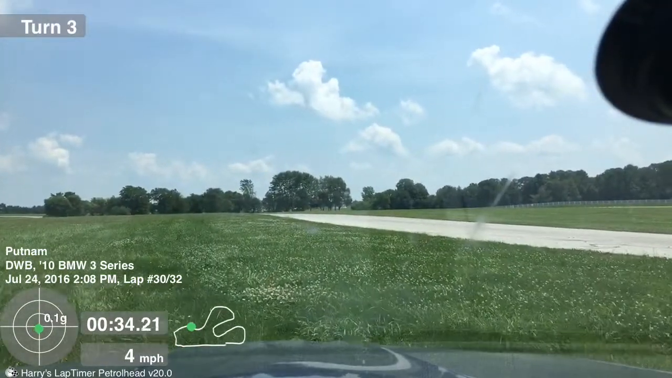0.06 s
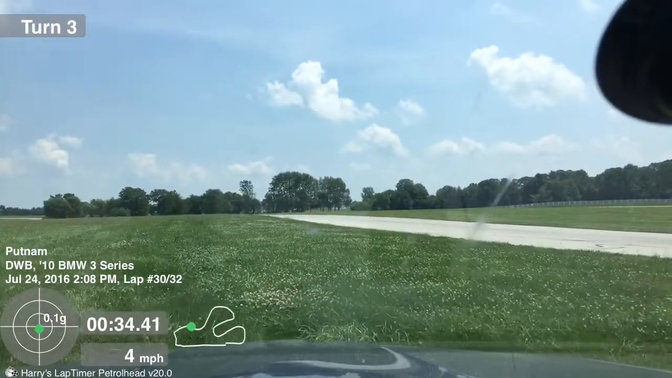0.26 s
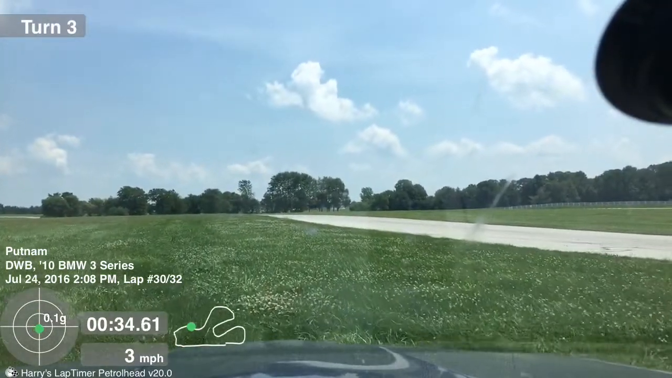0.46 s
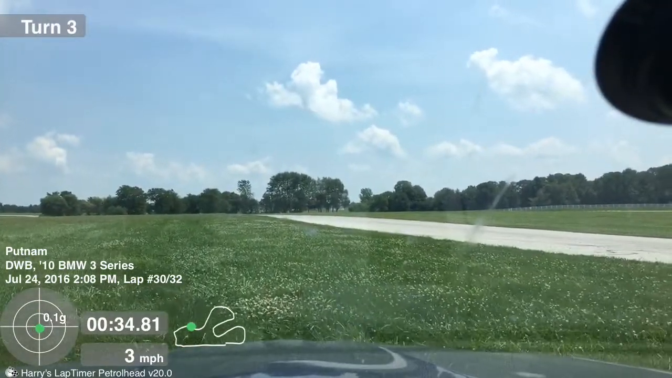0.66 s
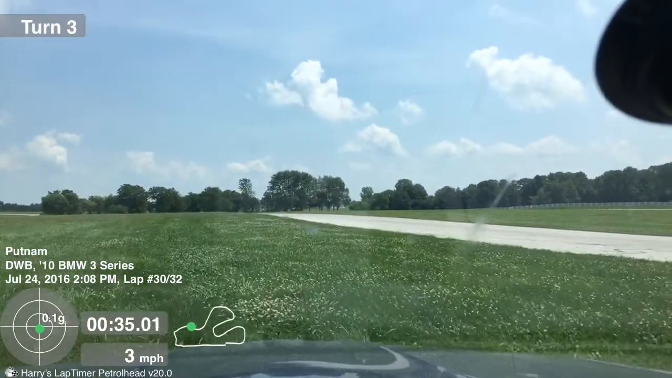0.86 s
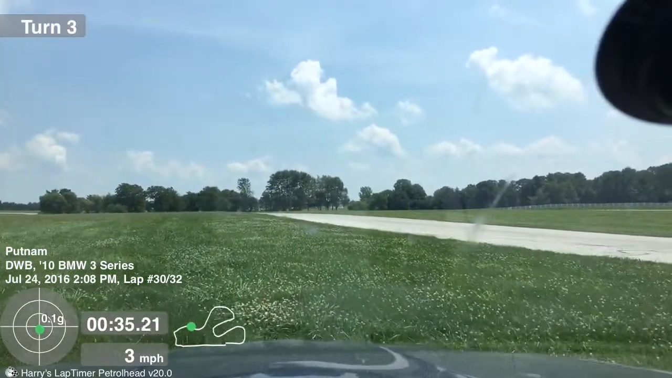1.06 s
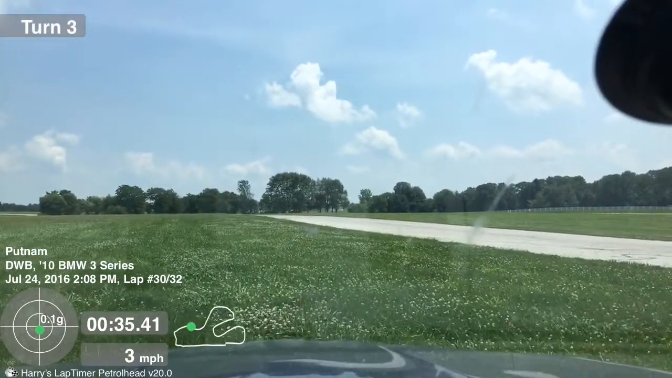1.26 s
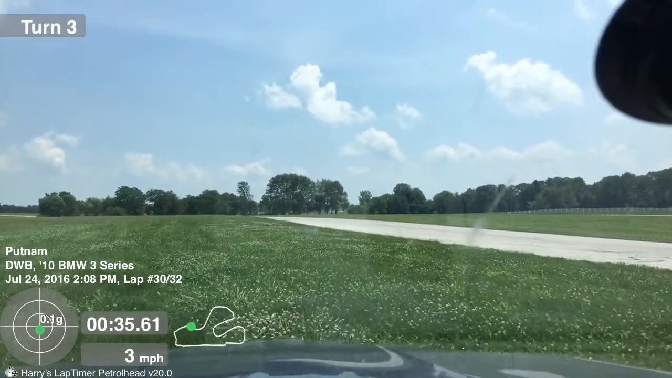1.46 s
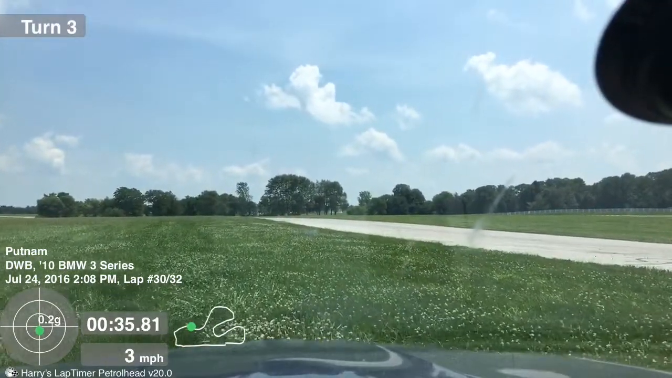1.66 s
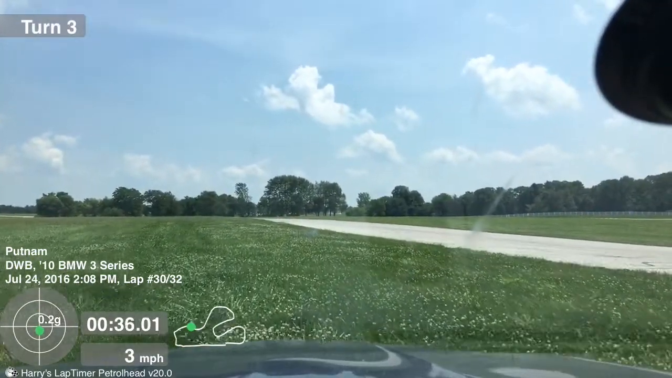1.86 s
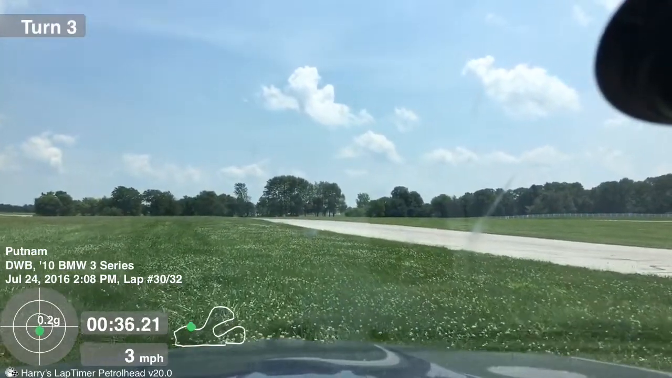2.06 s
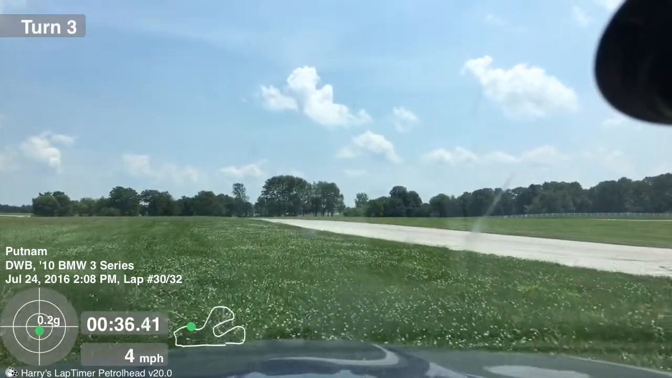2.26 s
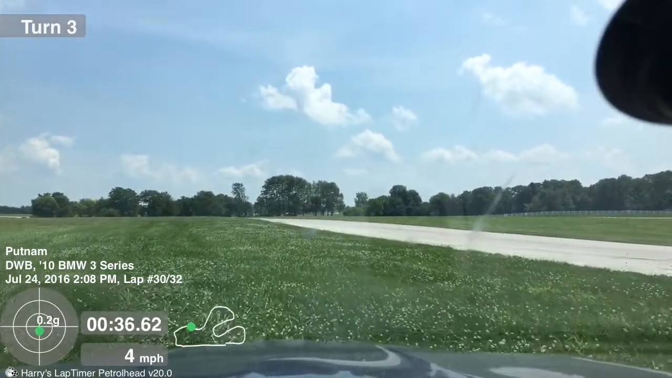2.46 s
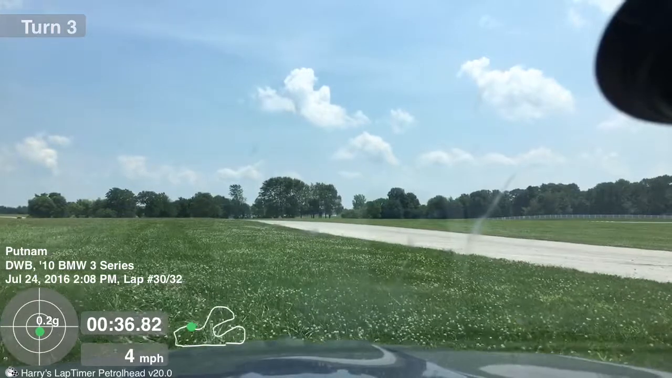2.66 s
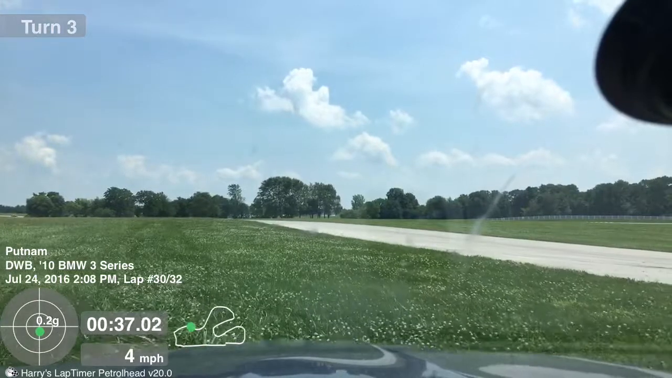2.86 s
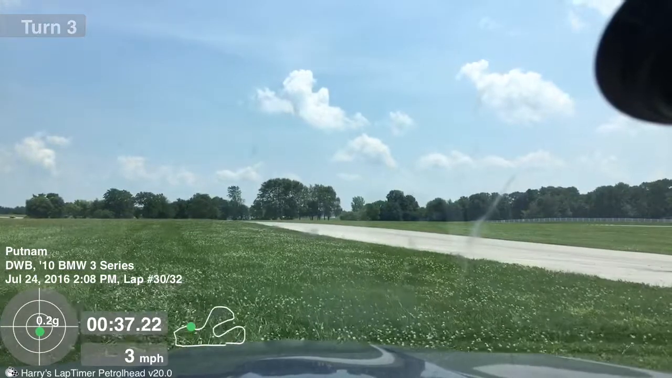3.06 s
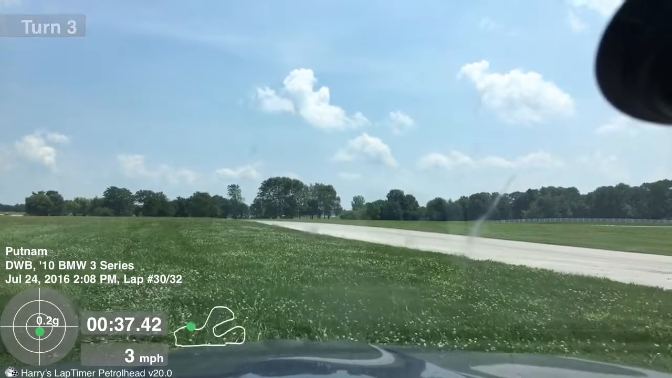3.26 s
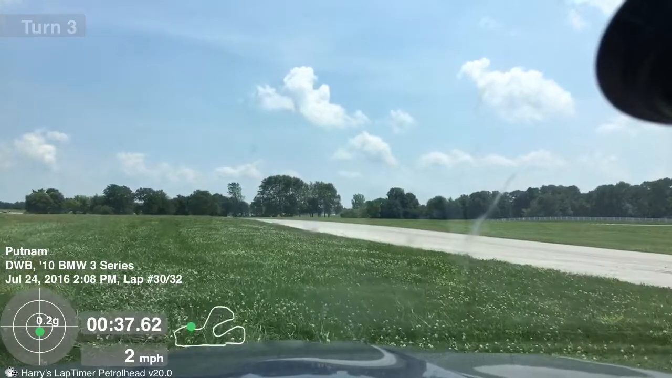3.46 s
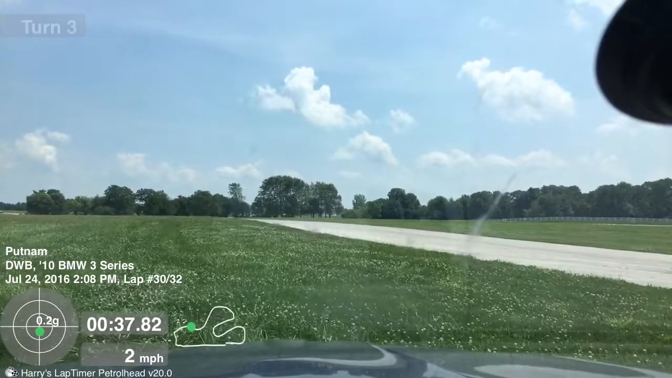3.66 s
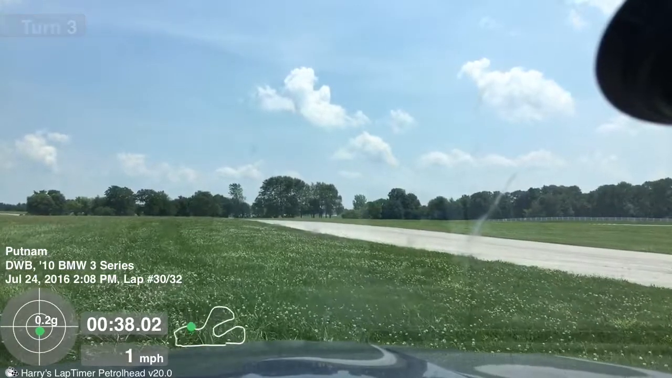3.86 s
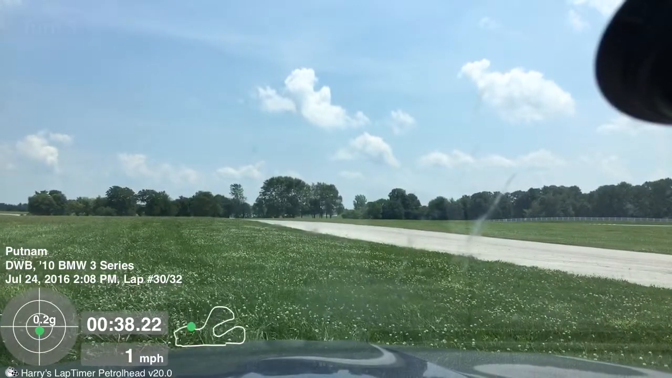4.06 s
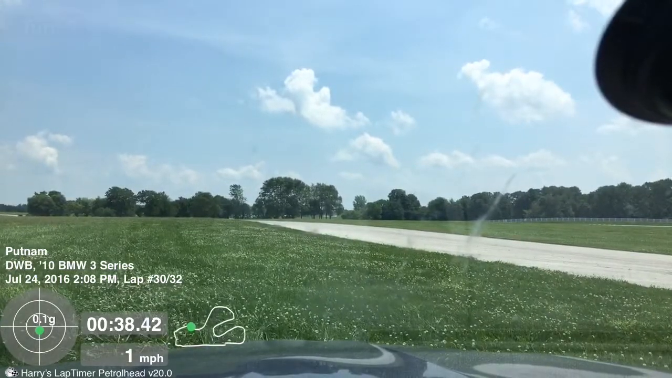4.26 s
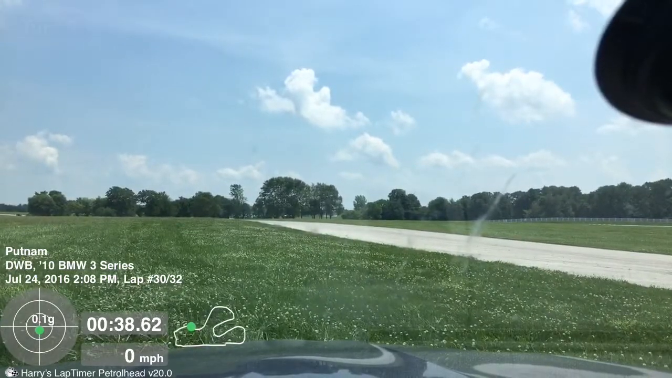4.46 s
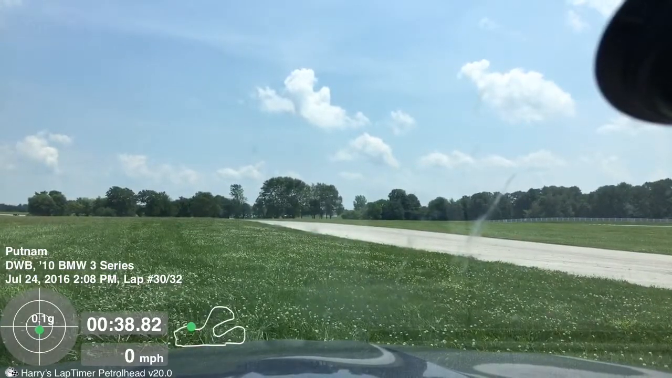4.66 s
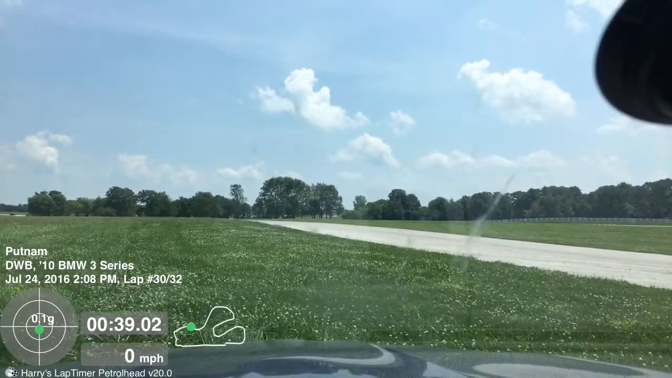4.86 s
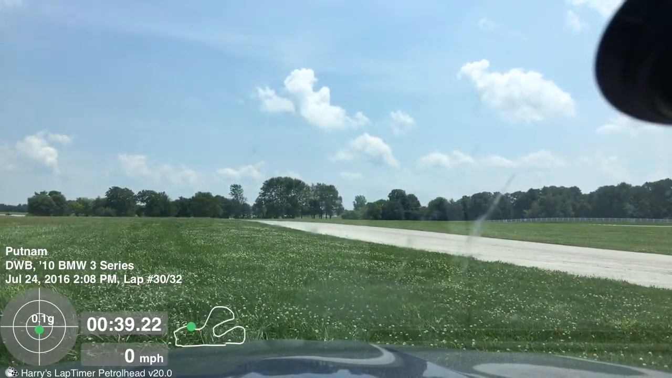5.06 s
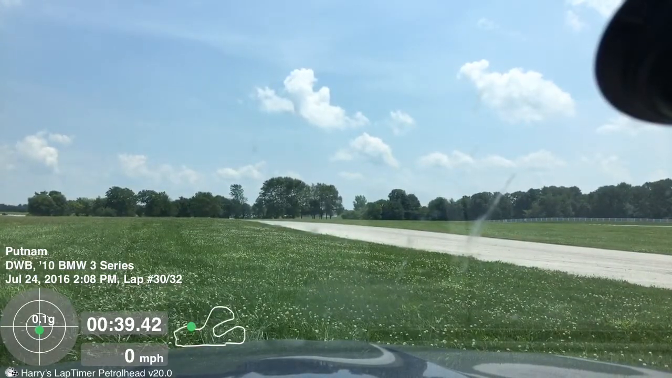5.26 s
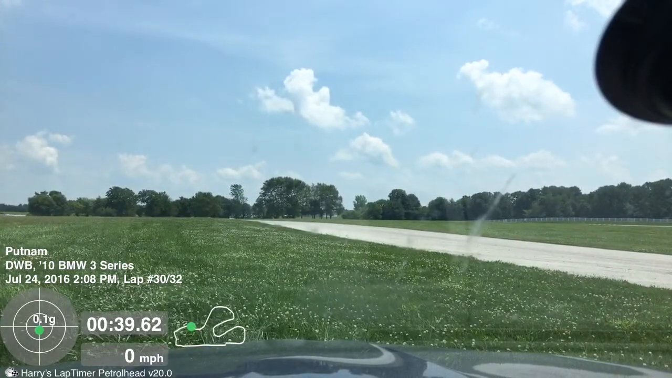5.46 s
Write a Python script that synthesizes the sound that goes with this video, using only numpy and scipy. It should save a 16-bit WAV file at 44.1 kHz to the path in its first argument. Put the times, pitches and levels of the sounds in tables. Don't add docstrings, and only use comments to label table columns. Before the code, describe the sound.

Close car-cabin sound: deep engine drone, muffled bumps and crackly rustling, a hollow gear lever knock midway, then steady idle with airy fan hiss.

```python
import sys
import numpy as np
from scipy import signal
from scipy.fft import rfft, irfft
from scipy.io import wavfile
from scipy.ndimage import uniform_filter1d

SR = 44100
rng = np.random.default_rng(int(sys.argv[2]) if len(sys.argv) > 2 else 0)


def persist_wave(psi):
    counts = np.round(np.clip(psi, -1, 1) * 32767).astype(np.int16)
    wavfile.write(sys.argv[1], SR, np.atleast_2d(counts).T)


def makeup_ratio(level_db):
    decades = np.asarray(level_db, float) / 20
    return 10 ** decades


N = 242991
T = np.arange(N) / SR

# time in seconds, firing rate in Hz, load in dB.
ENGINE_RUN = [(0, 39.77, -6), (.34, 39.17, -16), (.72, 49.14, 0.5), (.92, 54.24, -3.5), (1.12, 65.74, -1.5),
              (1.28, 65.97, 1), (1.49, 54.5, 0.5), (1.7, 51.35, 0.5), (2.09, 50.35, 1.5), (2.36, 54.12, 2),
              (2.49, 53.98, -2), (2.7, 49.45, 0.5), (2.9, 49.16, -1), (3.06, 50.15, 3), (3.19, 49.3, -15),
              (3.685, 35.12, -30), (3.99, 39.07, -17), (5.51, 40.95, -7)]


def curve(rows):
    s, *columns = np.transpose(rows)
    return [np.interp(T, s, column) for column in columns]


def evened(x):
    return x / np.sqrt(np.mean(x ** 2) + 1e-20)


def add(mix, s, sound):
    part = mix[round(s * SR):][:len(sound)]
    part += sound[:len(part)]


def coloured(x, points):
    hz, db = np.transpose(points)
    f = np.fft.rfftfreq(len(x), 1 / SR)
    gain_db = np.interp(np.log(f + 1), np.log(hz), db, -120, -120)
    return irfft(rfft(x) * makeup_ratio(gain_db), len(x))


def drift(top_hz):
    t = T[::128]
    rates = np.geomspace(top_hz / 20, top_hz, num=20)
    slow = sum(np.sin(2 * np.pi * (f * t + rng.random())) / np.sqrt(f) for f in rates)
    return np.interp(T, t, evened(slow))


def hump(centre, length):
    return np.cos(np.pi * np.clip((T - centre) / length, -.5, .5))


def ring(hz, t60, rise):
    t = np.arange(round(.3 * SR)) / SR
    return makeup_ratio(-60 * t / t60) * (1 - np.exp(-t / rise)) * np.sin(2 * np.pi * hz * t)


def banded(noise, hz, spread):
    away = np.log2(np.fft.rfftfreq(len(noise), 1 / SR) / hz + 1e-9) / spread
    away = np.where(away < 0, 0.49 * away, away)
    gain = np.exp(-.5 * away ** 2) + 0.17 * np.exp(-.12 * away ** 2)
    return evened(irfft(rfft(noise) * gain, len(noise)))


def fuzzy(hz, width):
    r = np.exp(-np.pi * width / SR)
    poles = [1, -2 * r * np.cos(2 * np.pi * hz / SR), r * r]
    return evened(signal.lfilter([1, 0, -1], poles, rng.standard_normal(N)))


def hiss():
    # frequency in Hz, level in dB per Hz.
    cabin = [(170, -3), (190, -9.5), (267, -14), (398, -14.5), (626, -19.5), (846, -26), (1310, -24.5),
             (1700, -28.5), (2150, -34.5), (2900, -45.5), (4200, -44), (5000, -52), (7000, -55.5),
             (15600, -78.5)]
    idle_hz, growl_db_per_hz, throb_share = 40, 0.27, 0.071
    firing_hz = curve(ENGINE_RUN)[0]
    fan = np.clip((T - 4.12) / 0.96, 0, 1)
    level_db, bright_db = -58.5 + 1.5 * fan, 7 * fan
    growl_db = 0.5 + growl_db_per_hz * np.clip(firing_hz - idle_hz, 0, 12)
    air = coloured(rng.standard_normal(N), cabin)
    air = air / np.std(coloured(air, [(900, 0), (2200, 0)]))
    top = signal.sosfilt(signal.butter(2, 1400, "high", fs=SR, output="sos"), air)
    low = coloured(air, [(150, 0), (340, 0), (450, -30)])
    gusts_db = .7 * drift(16)
    throb = 1 + throb_share * np.cos(2 * np.pi * np.cumsum(firing_hz) / SR)
    wash = air + (makeup_ratio(bright_db) - 1) * top + (makeup_ratio(growl_db) - 1) * low
    return throb * makeup_ratio(level_db + gusts_db) * wash


def hums():
    # frequency in Hz, width in Hz, level in dB.
    panel_modes = [(254.8, 12, -59.5), (330.8, 7.7, -62), (398.3, 12, -57.5), (786, 48, -79),
                   (1287, 44, -66), (1446, 40, -71.5), (1600, 54, -70.5), (1768, 38, -77),
                   (4200, 330, -77.5), (6200, 1200, -79.5)]
    return sum(makeup_ratio(db) * fuzzy(hz, width) for hz, width, db in panel_modes)


def whines():
    # time in seconds, frequency in Hz, level in dB.
    motor = [(0, 170, -67), (2.3, 187, -54), (2.7, 183.8, -47.5), (3.4, 190.8, -48), (4.2, 199, -52),
             (5.51, 205.4, -56)]
    panel = [(0, 266, -57.5), (3.75, 262.6, -85), (3.95, 268.9, -47), (4.15, 268, -48.5), (4.3, 281, -81),
             (5.51, 280.2, -72)]
    out = 0
    for hz, db in curve(motor), curve(panel):
        out = out + makeup_ratio(db + 1.1 * drift(6.7)) * np.sin(2 * np.pi * np.cumsum(hz) / SR)
    return out


def rumble():
    # frequency in Hz, level in dB per Hz.
    body_colour = [(22, -42), (36, -3.5), (45, 1), (75, -4.5), (100, -3), (155, -3.5), (180, -24.5),
                   (260, -21)]
    # frequency in Hz, width in Hz.
    air_mode = (73.7, 3.3)
    # time in seconds, roughness of the ground in dB, shudder of the body in dB.
    ground = [(0, -3, -5), (.4, 3, 3.5), (.8, -4, 0.5), (1.1, -5, 4.5), (1.4, -1, 0.5), (2, 1, 1.5),
              (2.5, 3.5, -0.5), (2.9, -3, 0.5), (3.15, 8, 3.5), (3.45, 6, 3), (3.7, -8, -1.5),
              (3.9, -10, -1), (4.2, 1, 0.5), (4.6, 7.5, -1), (5, 6, -2.5), (5.51, 9, 1.5)]
    rough_db, shudder_db = curve(ground)
    body_db, boom_db = -36 + shudder_db, -46 + rough_db
    body = evened(coloured(rng.standard_normal(N), body_colour))
    boom = coloured(fuzzy(*air_mode), [(45, -25), (62, 0), (86, 0), (120, -25)])
    return makeup_ratio(body_db + 0.51 * drift(13)) * body + makeup_ratio(boom_db) * boom


def bumps():
    # start in seconds, peak in dB, frequency in Hz, 60 dB decay time in seconds.
    thuds = [(0.059, -14, 165, 0.043), (0.083, -25, 102, 0.066), (0.13, -20, 129, .05),
             (.47, -8, 119, 0.057), (.475, -26, 200.1, .06), (1.032, -12, 68, 0.12),
             (1.12, -20.5, 176, 0.14), (3.069, -16.5, 143, 0.043), (3.28, -19, 137.6, 0.12),
             (2.9, -24, 74.4, .049), (3.47, -21, 82.03, 0.12), (3.581, -22.5, 78, 0.23),
             (4.75, -33, 215, 0.063), (4.975, -38, 255, 0.041), (4.977, -17, 190, 0.06)]
    out = np.zeros(N)
    for s, db, hz, t60 in thuds:
        add(out, s, makeup_ratio(db) * ring(hz, t60, 0.0068))
    return out


def rustle():
    # time in seconds, cloth level in dB.
    movement = [(0, -64), (.6, -66), (.95, -66), (1.3, -67.5), (1.87, -69), (2.13, -66), (2.36, -61.5),
                (2.56, -67), (3.16, -63.5), (3.83, -66.5), (4.85, -72), (5.03, -64.5), (5.22, -58.5),
                (5.34, -70), (5.51, -66)]
    # frequency in Hz, level in dB per Hz.
    cloth = [(1500, -8), (3000, 0.5), (5000, -4), (8000, -9), (12000, -11.5), (15500, -12.5)]
    # start in seconds, length in seconds, level in dB, centre in Hz.
    strokes = [(0.27, 0.044, -59, 8000), (0.475, 0.13, -55, 6400), (0.565, 0.031, -48, 8000),
               (.643, .014, -61, 6000), (0.676, 0.026, -64, 5500), (1.115, .03, -66, 5500),
               (1.23, 0.1, -60, 10000), (1.338, 0.033, -63, 5000), (1.367, 0.046, -59.5, 7000),
               (2.131, 0.074, -64, 6484), (2.236, 0.038, -55, 7000), (2.27, 0.051, -55.5, 7000),
               (2.313, 0.095, -63, 7000), (2.402, 0.067, -66, 7040), (2.972, 0.02, -64, 9000),
               (3.06, 0.077, -60, 8000), (3.116, 0.034, -68, 5000), (3.402, .02, -61, 8000),
               (3.272, 0.071, -72, 6490), (3.561, 0.063, -64, 7960), (5.008, 0.14, -65, 6920),
               (5.224, 0.043, -72, 7510), (5.292, 0.037, -62, 8500)]
    slips_per_s, grain_s = 300, 0.0068
    slips = makeup_ratio(2.6 * np.minimum(rng.exponential(1, N), 5)) * (rng.random(N) < slips_per_s / SR)
    grain = 1.4 + evened(signal.lfilter([1], [1, -np.exp(-1 / (grain_s * SR))], slips))
    brush = evened(coloured(grain * rng.standard_normal(N), cloth))
    out = makeup_ratio(curve(movement)[0] - 2.5) * brush
    fibres = evened(grain) * rng.standard_normal(N)
    for s, length, db, hz in strokes:
        stroke = banded(fibres[round(s * SR):][:round(length * SR)], hz, 1.0)
        add(out, s, makeup_ratio(db) * stroke * signal.windows.tukey(len(stroke), .7))
    return out


def tick(db, hz, t60, spread, crack_db, rise, floor_hz):
    noise, lumps = rng.standard_normal((2, 4096))
    t, f = np.arange(4096) / SR, np.fft.rfftfreq(4096, 1 / SR)
    scrape = makeup_ratio(-60 * t / t60 + 1.2 * evened(uniform_filter1d(lumps, size=90)))
    burst = makeup_ratio(crack_db - 60 * t / 0.0048)
    tail = makeup_ratio(-13 - 60 * t / 0.15)
    shape = (burst + scrape + tail) * (1 - np.exp(-t / rise))
    blow = 1. * (np.arange(4096) == 40)
    crack = banded(blow, hz, 0.84 * spread)
    thin = irfft(rfft(banded(noise, hz, spread)) * f ** 4 / (f ** 4 + floor_hz ** 4), 4096)
    return makeup_ratio(db - 13.0) * (shape * thin + makeup_ratio(crack_db + 13.0) * crack / crack.max())


def cloth_ticks():
    # start in seconds, peak in dB, centre in Hz, 60 dB decay time in seconds.
    creases = [(.1715, -58, 5000, .03), (0.281, -40.5, 6800, .06), (.2885, -44, 7500, .05),
               (0.303, -43, 7500, 0.036), (.3085, -52, 6500, .03), (.3561, -43.5, 5600, .04),
               (.5565, -42, 4500, .03), (.5865, -46, 5000, 0.031), (.5915, -51, 8000, 0.018),
               (.946, -49, 4420, .05), (1.2291, -49, 6500, .03), (1.3652, -40, 5000, 0.025),
               (1.3855, -46, 4500, .03), (1.4014, -48, 9000, 0.038), (2.1854, -42, 6000, .03),
               (2.246, -38, 5000, 0.028), (2.254, -33.5, 5600, .03), (2.2645, -48, 5000, .025),
               (2.274, -38, 8000, .035), (2.277, -38, 3700, .03), (2.29, -31, 4200, 0.034),
               (2.304, -50, 6000, .03), (2.321, -46, 7000, .03), (2.349, -45, 5860, .05),
               (2.6157, -52, 4077, 0.054), (2.7217, -51, 6953, 0.049), (2.9282, -47, 6993, 0.038),
               (2.953, -45, 8000, 0.02), (3.022, -38.5, 6502, 0.033), (3.093, -35, 7050, 0.036),
               (3.1095, -38, 8720, .02), (3.113, -48, 9000, 0.022), (3.126, -43, 6500, .04),
               (3.236, -49, 6500, 0.023), (3.2838, -48, 5500, .03), (3.313, -43, 5000, .04),
               (3.3215, -51, 5530, .03), (3.522, -47, 4980, 0.03), (3.5959, -41, 6960, 0.031),
               (5.0734, -43, 4122, .04), (5.1038, -43, 7000, .03), (5.227, -37, 7210, 0.05),
               (5.243, -44, 6500, 0.032), (5.2915, -42, 4165, .03), (5.315, -38, 7530, 0.045),
               (5.3858, -34.5, 6570, 0.029), (5.5014, -40.5, 4203, 0.052)]
    out = np.zeros(N)
    for s, db, hz, t60 in creases:
        add(out, s, tick(db, hz, t60, spread=0.5, crack_db=-1, rise=0.0013, floor_hz=2980))
    return out


def trim_ticks():
    # start in seconds, peak in dB.
    clip_ticks = [(0.1584, -45), (0.259, -48), (0.516, -40), (0.539, -34), (0.549, -31.5), (.650, -47),
                  (0.695, -56), (.7447, -57), (1.1312, -39), (1.29, -43), (1.807, -49.5), (1.836, -49.5),
                  (1.845, -61), (1.908, -59), (2.081, -51), (2.146, -49), (2.17, -47), (2.239, -37.5),
                  (2.411, -46), (2.4398, -47), (2.4625, -47), (2.5295, -44.5), (2.571, -46), (2.787, -47.5),
                  (3.201, -44), (3.2185, -49), (3.274, -44.5), (3.346, -50), (3.4008, -43.5),
                  (3.483, -48.5), (5.12, -44.5)]
    # start in seconds, peak in dB, centre in Hz, spread in octaves, first crack in dB.
    sharp_ticks = [(0.2967, -46, 5570, 0.31, 10.5), (0.3282, -39.5, 4300, 0.97, 6),
                   (0.495, -45.5, 4270, 0.56, 11), (0.5721, -25.5, 4900, 0.64, 7.5),
                   (0.5727, -36, 12000, 0.27, 10), (.674, -33, 5570, 0.59, 0), (1.375, -32, 4900, 0.55, 2),
                   (1.7533, -40.5, 3400, 0.37, -1), (2.213, -33.5, 5840, 0.45, 7),
                   (2.295, -45.5, 4200, 0.21, 11), (2.971, -30.5, 6450, 0.38, 5.5),
                   (2.9712, -38.5, 12000, 0.34, 6), (2.973, -40, 7000, 0.97, 10),
                   (3.557, -36.5, 7400, 0.53, -6), (4.2097, -40.5, 4200, 1.1, 3)]
    rise, floor_hz = 0.00028, 1500
    out = np.zeros(N)
    for s, db, hz, spread, crack_db in sharp_ticks:
        add(out, s, tick(db, hz, 0.048, spread, crack_db, rise, floor_hz))
    for s, db in clip_ticks:
        add(out, s, tick(db, 4500, 0.074, 0.76, 1.5, rise, floor_hz))
    return out


def snaps():
    # start in seconds, peak in dB, frequency in Hz, 60 dB decay time in seconds.
    plastic = [(0.551, -36, 2700, 0.013), (0.553, -42, 1110, .02), (.5712, -47, 2840, 0.022),
               (0.5708, -38, 1650, 0.037), (0.5727, -42, 1140, .025), (.572, -46, 2100, .02),
               (.6748, -49, 2200, .015), (0.6742, -39, 4100, 0.014), (1.1318, -51, 2000, .02),
               (1.3767, -49, 1800, 0.049), (1.754, -52, 2200, 0.026), (2.2465, -50.5, 1970, 0.084),
               (2.9697, -46, 1890, 0.015), (3.0692, -48, 1764, 0.014), (3.0704, -42, 1140, 0.051),
               (3.0705, -42, 1302, .03), (3.071, -57, 2900, 0.018), (3.073, -48, 2420, .03),
               (3.079, -50, 1555, 0.046), (3.1038, -52, 1170, 0.036), (3.17, -45, 1200, 0.027),
               (3.1992, -52.5, 2250, 0.028), (3.4, -47, 7190, .012), (3.4002, -40, 2793, 0.0099),
               (3.4015, -39, 1600, .012), (4.2085, -48, 6200, .012), (4.211, -34, 3000, 0.0055),
               (4.2125, -33.5, 1620, .014), (4.215, -47, 6090, .008), (4.2168, -36, 1400, .012),
               (4.2215, -44, 1740, 0.027)]
    out, t = np.zeros(N), np.arange(2048) / SR
    for s, db, hz, t60 in plastic:
        crack = banded(rng.standard_normal(2048), hz, 0.23)
        add(out, s, makeup_ratio(db + 1.5) * ring(hz, t60, 0.00084))
        add(out, s, makeup_ratio(db - 5.5 - 60 * t / t60) * (1 - np.exp(-t / 0.00019)) * crack)
    return out


def lever_knocks():
    # start in seconds, peak in dB, share of the high modes in dB, pitch factor, rise in seconds.
    blows = [
        (3.071, -19.5, 0, 1.0, 0.0018),
        (3.104, -28, 4, 1.02, 0.0035),
        (3.125, -30, 0, 1.06, 0.0033),
        (3.170, -23.5, -1, .99, 0.0039),
        (3.186, -24.5, -7, 0.99, 0.0025),
    ]
    # frequency in Hz, level in dB, 60 dB decay time in seconds.
    modes = [(281, 5.5, 0.068), (353, -4.5, 0.12), (400, -5.5, 0.086), (716, -0.5, 0.046),
             (900, -23, 0.031), (1186, -11.5, 0.052), (1510, -24, .06)]
    out, t = np.zeros(N), np.arange(2048) / SR
    for s, db, bright_db, pitch, rise in blows:
        body = sum(makeup_ratio(level + bright_db * (hz > 550)) * ring(hz * pitch, t60, rise) for hz, level, t60 in modes)
        crack = banded(rng.standard_normal(2048), 1400, 0.71)
        add(out, s, makeup_ratio(db - 7.0) * body)
        add(out, s, makeup_ratio(db + bright_db - 32.0 - 60 * t / 0.18) * (1 - np.exp(-t / 0.0011)) * crack)
    return out


def engine():
    # multiple of
    # the firing rate, level in dB.
    weak_lines = [(1.5, -57), (3.5, -52), (5, -60), (6, -64.5), (8, -71), (10, -65.5)]
    # frequency in Hz, level in dB.
    carry = [(38, -23), (49, -24), (66, -33.5), (80, -33), (105, -35), (130, -31), (156, -37), (200, -60)]
    load_shares = [1.62, 0.37, 0.71, 0.3]
    # centre in seconds,
    # level in dB, multiple, length in seconds.
    surges = [(0.167, -31, 2, 0.06), (0.26, -32, 2, 0.059), (0.38, -29.5, 2, 0.19), (0.519, -25, 2, 0.035),
              (0.686, -51, 3, 0.21), (.81, -36, 1, .12), (0.953, -36.5, 3, 0.032), (1.124, -22, 2, 0.023),
              (1.26, -31, 1, 0.088), (1.749, -38.5, 3, 0.32), (1.93, -38.5, 2, 0.12),
              (2.05, -35.5, 1, 0.47), (2.232, -34, 2, 0.092), (2.48, -44.5, 3, 0.32), (2.52, -48, 2, 0.031),
              (2.715, -50, 3, 0.42), (2.859, -37, 1.5, 0.16), (2.969, -35.5, 2, 0.087),
              (3.089, -29, 3, 0.052), (3.16, -35, 3, 0.061), (3.298, -28.5, 1, 0.095),
              (3.479, -32.5, 1, 0.14), (3.908, -32.5, 2, 0.1), (4.08, -36.5, 2, 0.13),
              (4.2, -49, 1.5, 0.49), (4.28, -34, 2, .11), (4.463, -37, 2, 0.13), (4.496, -44, 1, 0.77),
              (4.38, -42, 3, 0.36), (5.153, -49.5, 4, 0.33), (4.627, -33.5, 2, 0.14),
              (4.765, -31, 2, 0.059), (4.891, -35, 2, 0.098), (4.974, -33, 3, 0.072), (5.092, -37, 2, 0.12),
              (5.203, -37, 2, 0.058), (5.322, -39, 2, 0.062), (5.497, -35, 2, 0.048)]
    # centre in seconds, change in dB, multiple, length in seconds.
    lulls = [(.1, -3, 1, .25), (1.073, -7.5, 2, 0.078), (2.32, -4, 2, 0.17), (2.76, -13, 2, 0.34),
             (3.381, 0, 3, .2), (3.62, -11, 4, .3), (3.7, -10, 1, 0.29)]
    hz, load_db = curve(ENGINE_RUN)
    carry_hz, carry_db = np.transpose(carry)
    lines = []
    for k, share in enumerate(load_shares, start=1):
        carried_db = np.interp(np.log(k * hz), np.log(carry_hz), carry_db)
        lines.append((k, share * load_db + carried_db))
    phase = 2 * np.pi * np.cumsum(hz) / SR + .06 * drift(12)
    out = 0
    for k, db in lines + weak_lines:
        surge = sum(makeup_ratio(top_db) * hump(s, length) for s, top_db, m, length in surges if round(2 * m) == 2 * k)
        lull_db = sum(low_db * hump(s, length) for s, low_db, m, length in lulls if round(m) == k)
        level = makeup_ratio(db + lull_db + 1.2 * drift(14)) + surge
        out = out + np.sqrt(2) * level * np.cos(k * phase + .6 + .25 * drift(5))
    return out


def scene():
    background = hiss() + hums() + whines() + rumble() + bumps()
    near = rustle() + cloth_ticks() + trim_ticks() + snaps() + lever_knocks()
    return (background + near + engine())[None]


def top_cut(x):
    return signal.sosfilt(signal.butter(12, 15660, fs=SR, output="sos"), x)


def record(dry):
    limited = signal.oaconvolve(dry, signal.firwin(301, 15250, fs=SR)[None], "same")
    limited = limited * np.clip(np.minimum(T, T[::-1]) / .003 + .3, 0, 1)
    return top_cut(limited)


dry = scene()
out = record(dry)
persist_wave(out)
```